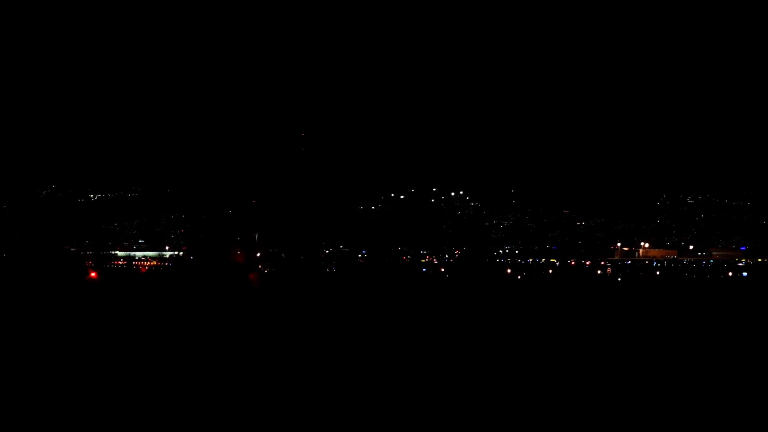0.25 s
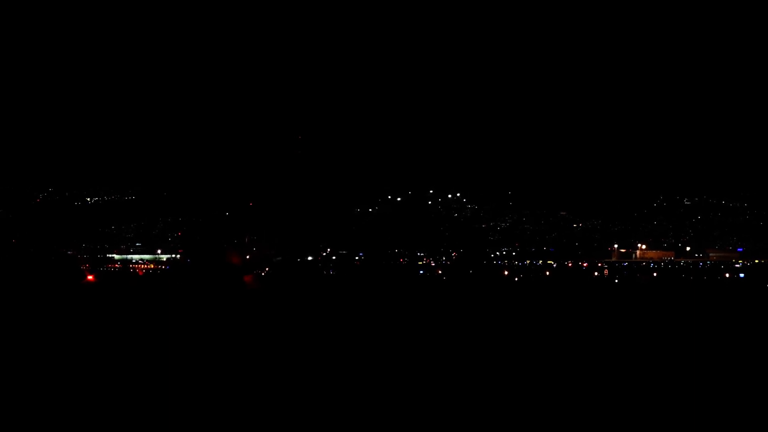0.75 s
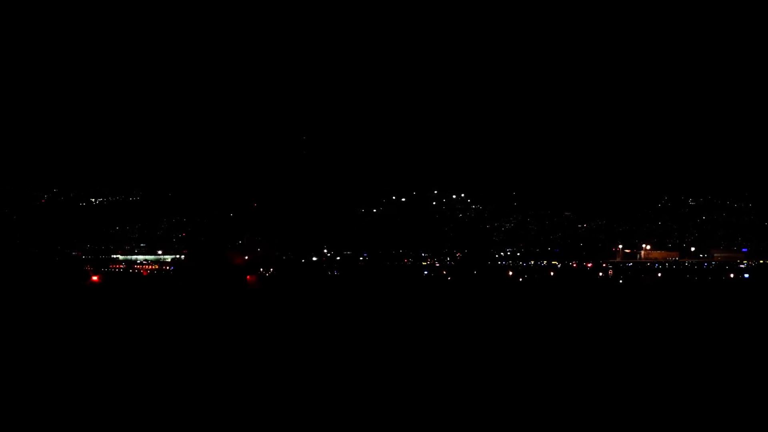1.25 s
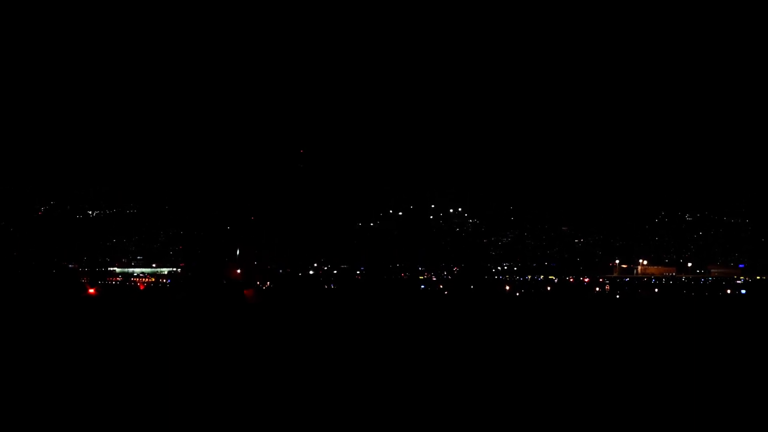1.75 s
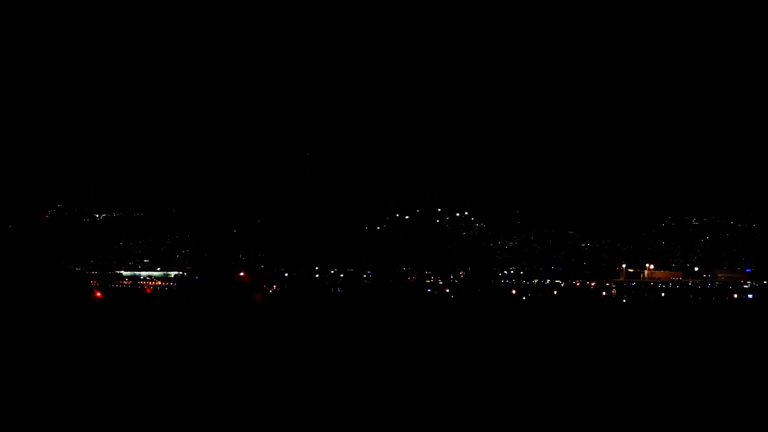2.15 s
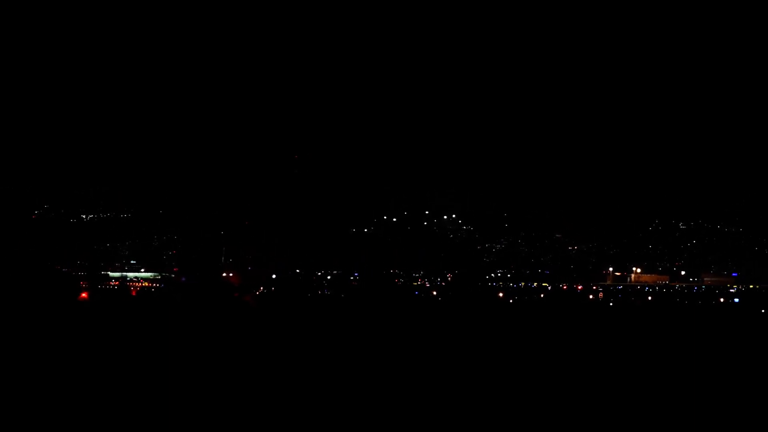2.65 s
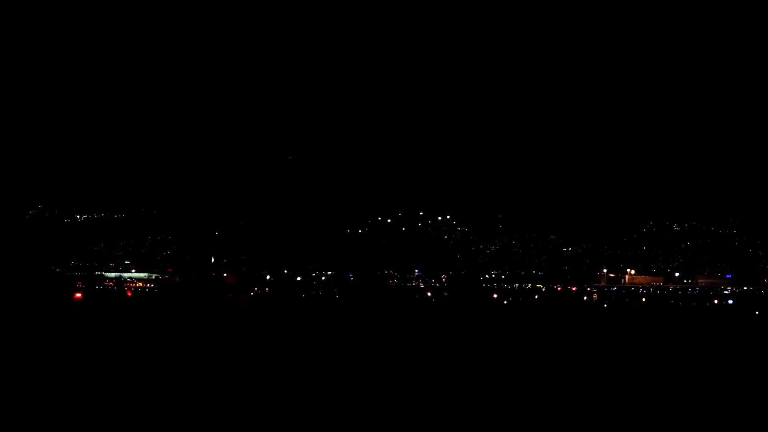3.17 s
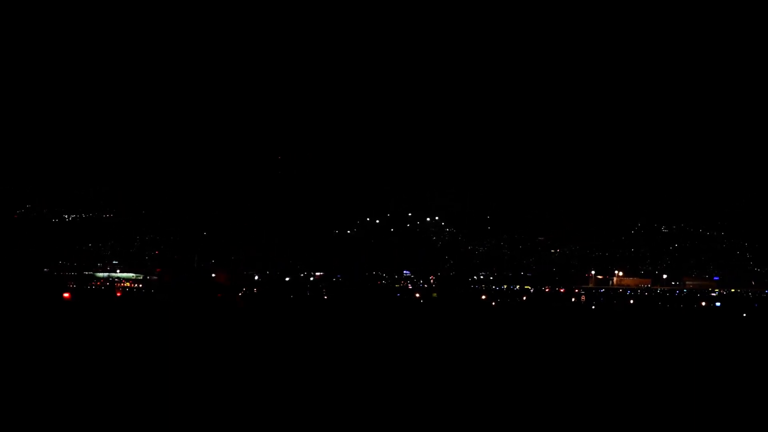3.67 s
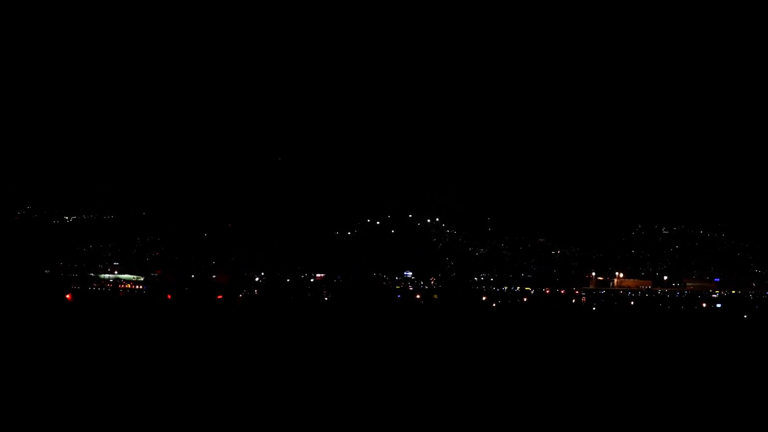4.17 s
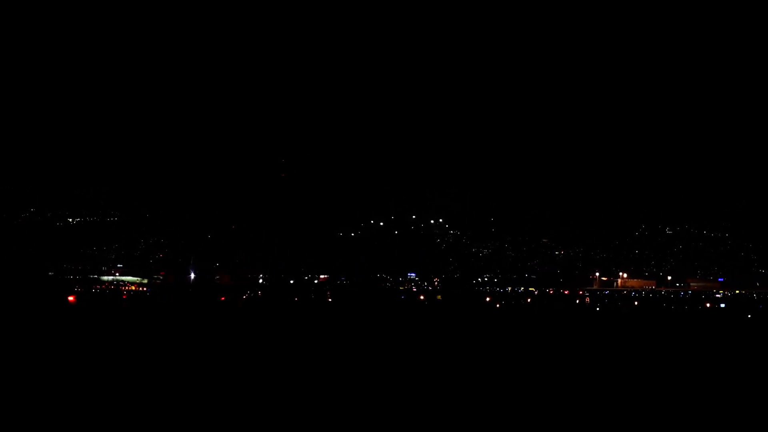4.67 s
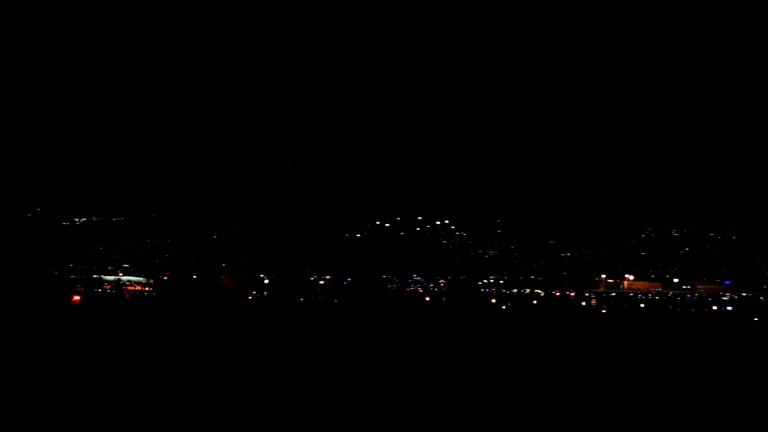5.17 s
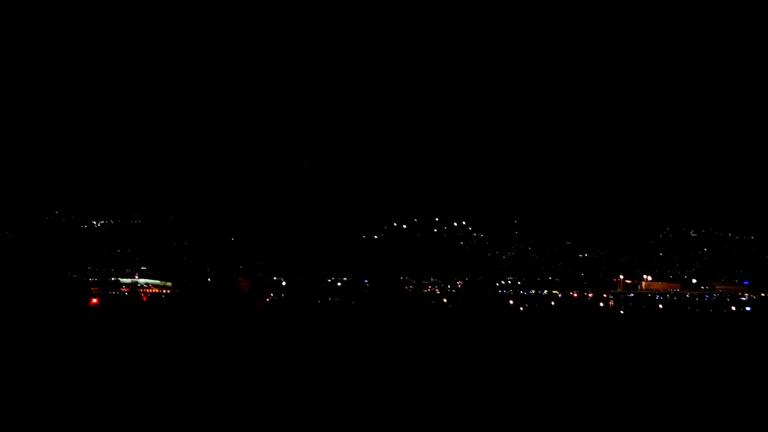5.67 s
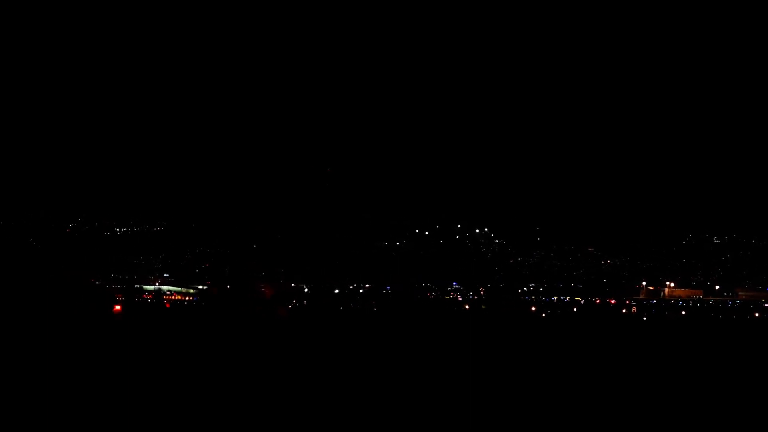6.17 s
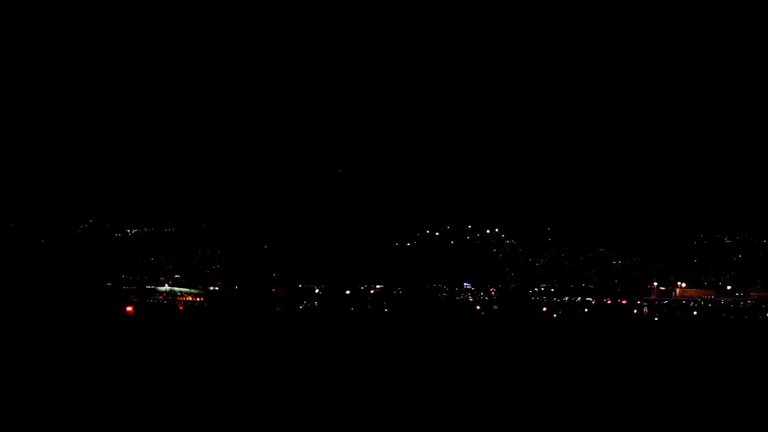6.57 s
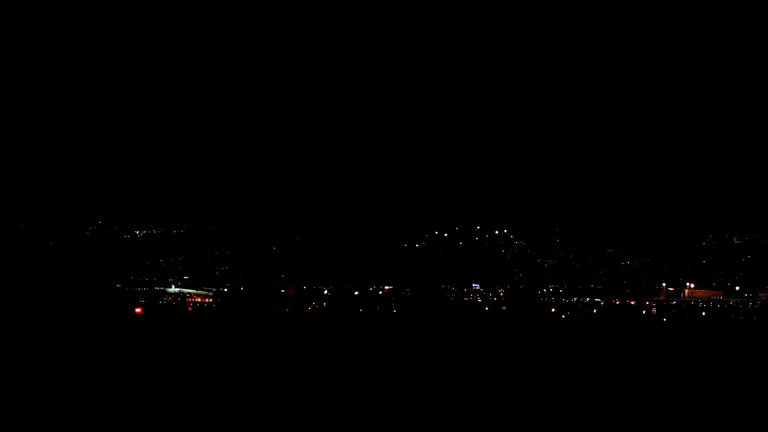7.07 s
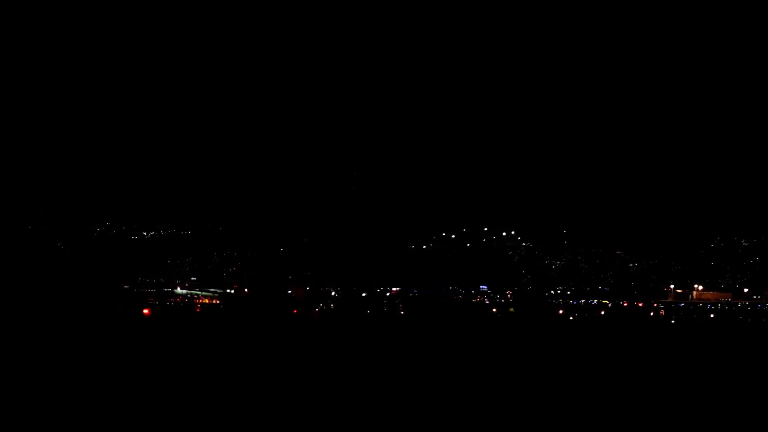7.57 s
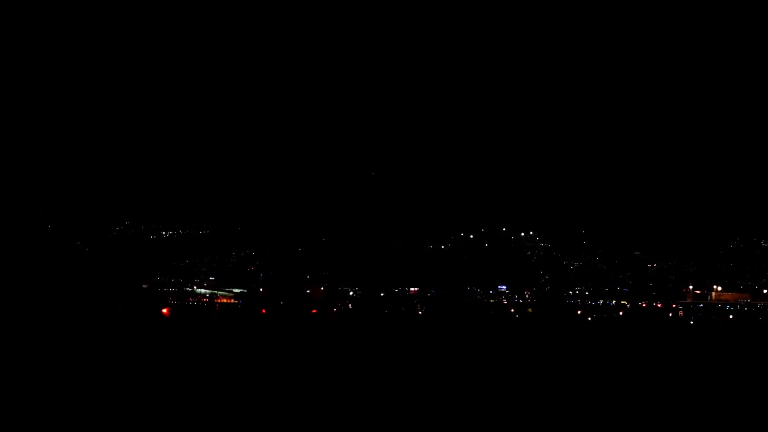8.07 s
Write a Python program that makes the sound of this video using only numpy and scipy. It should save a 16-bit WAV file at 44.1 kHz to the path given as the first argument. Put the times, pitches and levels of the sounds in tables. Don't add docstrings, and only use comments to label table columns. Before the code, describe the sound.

A distant jet airliner's low rumble swells to a heavy roar over a dark airfield while crickets and katydids chirp close by and wind buffets the microphone.

```python
import sys
import numpy as np
from scipy import signal
from scipy.fft import rfft, irfft, next_fast_len
from scipy.io import wavfile

SR = 44100
rng = np.random.default_rng(int(sys.argv[2]) if len(sys.argv) > 2 else 0)


def gain_from_db(level_db):
    decades = np.asarray(level_db, float) / 20
    return 10 ** decades


def transcribe(signal):
    frames = np.atleast_2d(signal).T
    limited = np.clip(frames, -1, 1)
    pcm = np.round(limited * 32767).astype(np.int16)
    wavfile.write(sys.argv[1], SR, pcm)


N = 367132

# f/Hz, density/dB
JET_SPECTRUM = [(12, -53), (22, -12.5), (54, 4.5), (105, -2), (187, -18), (400, -16.5), (600, -17),
                (780, -27), (950, -23), (1180, -30.5), (1430, -28.5), (1800, -37.5), (2080, -37),
                (2800, -44), (3800, -69)]
JET_SPLIT_HZ = [70, 170, 750]
# nearest level/dB, share of nearness, idle far-field level/dB, idle change/(dB/s)
JET_RANGES = [
    (-45, 1.11, -77, 3.5),
    (-44.5, 1.14, -59.5, .5),
    (-49, 1.01, -63.5, .2),
    (-57.5, 0.93, -67, -2.5),
]
# t/s, level/dB
NEARNESS = [(0, -17), (.4, -23.5), (2.3, -20), (3.1, -12), (3.9, -10.5), (4.9, -7.5), (5.7, -4), (6.0, -2),
            (6.45, -0.5), (6.8, 0), (7.1, 0.5), (7.5, .5), (8.0, 1), (8.33, 0.5)]
# start/s, length/s, added amplitude re steady level/dB
SURGES = [
    (6.3, 0.29, -9),
    (7.3, 0.32, -6.5),
]
# t/s, f/Hz, level re roar/dB
RIDGE = [
    (0, 526, -10.5),
    (4.5, 524.7, -17.5),
    (5.8, 548.2, -13.5),
    (6.5, 617.6, -7),
    (7.0, 662, -7.5),
    (7.6, 695, -9.5),
    (8.33, 734, -10.5),
]
# f/Hz, density/dB
AIRFIELD = [(30, -19.5), (102, 4), (221, -8.5), (250, -14.5), (282, -6), (634, -25), (760, -29), (920, -23),
            (1200, -32.5), (1750, -20.5), (2700, -41.5), (4000, -84)]
AIRFIELD_DB = -60
# f/Hz, likeness
LIKENESS = [(100, .9999), (200, 0.99), (500, 0.98), (900, 0.87), (1500, 0.69), (2400, 0.37), (4400, -0.15),
            (12000, 0.012)]

# f/Hz, density/dB
NIGHT = [(1500, -13.5), (2300, -10.5), (2800, -21.5), (3800, -11.5), (4500, -14), (5900, -13), (6300, -15),
         (7400, -16.5), (9500, -11.5), (10250, -15), (10700, -19.5), (12500, -24.5), (15600, -37)]
NIGHT_DB = -73.5

# start/s, length/s, level/dB
GUSTS = [(0, 0.56, -68), (.85, .12, -70), (1.35, 0.16, -69), (2.36, 0.062, -73), (2.66, .28, -66),
         (3.0, 0.21, -75.5), (3.42, 0.19, -92), (4.22, .08, -80), (4.56, .08, -72), (5.14, .2, -82),
         (5.58, .08, -68), (5.83, 0.054, -77), (5.98, 0.16, -74), (6.66, .1, -57), (6.82, 0.21, -52.5),
         (7.22, 0.091, -69), (7.42, .2, -58.5), (7.72, 0.33, -56), (8.15, 0.18, -57.5)]
# f/Hz, density/dB
WIND = [(20, -12), (60, -2), (130, -4.5), (250, -14.5), (600, -43.5), (2000, -110)]
GUST_RISE_S, GUST_FALL_S, CALM_DB = 0.06, 0.065, -83

# start/s, length/s, level/dB
TRILL = [(0, .32, -70), (.55, 0.19, -70.5), (1.05, 0.16, -65.5), (1.47, 0.18, -66), (2.0, 0.22, -68.5),
         (2.5, 0.31, -64), (3.02, 0.31, -65.5), (3.46, 0.19, -68), (3.8, 0.074, -71), (3.95, 0.12, -65.5),
         (4.3, .28, -71), (4.75, .5, -76), (5.57, .2, -73), (6.0, 0.22, -71), (6.5, 0.38, -71.5),
         (6.98, 0.26, -71.5), (7.5, 0.22, -74), (8.06, .18, -71)]
TRILL_RISE_S, TRILL_FALL_S, TRILL_REST_DB = 0.09, 0.057, -90.5

CHORUS_START_DB, CHORUS_SWAY_DB, CHORUS_GROWTH_DB_PER_S = -83, 1.2, 0.45

# first/s, last/s, peak/dB
RATTLES = [
    (.1, .508, -80),
    (2.03, 2.03, -84),
    (2.17, 2.71, -80),
    (3.791, 3.791, -86),
    (4.383, 4.912, -81),
    (6.419, 7.086, -81),
]
# first/s, last/s, peak/dB, f/Hz, left re right/dB
PIPS = [
    (.131, 1.271, -75, 7000, -10),
    (.239, .613, -79, 6550, -4),
    (1.622, 2.968, -74, 6790, 3),
    (3.317, 4.408, -77, 6800, 4),
    (2.225, 2.575, -79, 6900, 2),
    (2.417, 3.816, -75, 6560, -3),
    (3.032, 4.119, -79, 6970, -4),
    (4.99, 5.727, -77, 6850, -10),
]
# first/s, last/s, peak/dB, start f/Hz, left re right/dB
SONGS_AHEAD = [
    (.494, .776, -63.5, 4025, 2.5),
    (4.26, 4.26, -79, 3800, 2.5),
    (4.33, 4.403, -70, 4000, 2.5),
    (4.348, 4.421, -79, 4100, 0),
    (4.467, 4.679, -62, 4030, 2.5),
]
# first/s, last/s, peak/dB, start f/Hz, left re right/dB
SONGS_ASIDE = [
    (1.368, 1.722, -73, 4200, 2),
    (2.099, 2.384, -71.5, 3980, -15),
    (2.43, 2.65, -74, 4150, 3),
    (2.502, 2.728, -75, 3900, -12),
    (2.786, 2.786, -69, 4000, 5),
    (2.856, 3.079, -65, 4120, 5),
    (6.214, 6.214, -72, 4000, 8),
    (6.29, 6.575, -65, 4070, 6),
    (7.114, 7.185, -74, 4200, 6),
    (7.34, 7.485, -74, 4220, -3),
]
# first/s, last/s, peak/dB, start f/Hz, left re right/dB
MUTTERS_AHEAD = [(.878, 1.009, -69, 3930, 2.5), (1.103, 1.155, -68, 3930, 4),
                 (1.266, 1.317, -69, 3840, 2.5), (4.778, 4.954, -69, 3920, 2.5),
                 (5.06, 5.106, -69, 3930, 2.5), (5.235, 5.326, -70, 3880, 2.5),
                 (5.446, 5.491, -72, 3950, 6), (5.65, 5.696, -69, 3870, 2.5)]
# first/s, last/s, peak/dB, start f/Hz, left re right/dB
MUTTERS_ASIDE = [(3.167, 3.24, -69, 3920, 4), (3.285, 3.401, -73, 3930, 5), (3.496, 3.574, -77, 3880, 2),
                 (3.67, 3.72, -74, 3900, 3), (3.808, 3.855, -77, 3850, 3), (6.669, 6.776, -70, 3950, 5),
                 (6.818, 6.948, -71, 3940, 5), (7.23, 7.348, -71, 3880, 3), (7.72, 7.769, -77, 4050, -6)]
# first/s, last/s, peak/dB
ZIPS = [(.64, .688, -71), (1.785, 1.857, -74), (2.909, 2.983, -74), (4.118, 4.19, -73), (5.293, 5.343, -72),
        (6.269, 6.318, -73), (7.571, 7.619, -72)]
SONG_GAP_S, MUTTER_GAP_S, PIP_GAP_S, ZIP_GAP_S, RATTLE_GAP_S = 0.071, 0.043, 0.36, 0.0245, 0.135

MOTOR_S = [0.189, 0.708, 1.189, 1.686, 2.189, 2.689, 3.187, 3.676, 4.177, 4.679, 5.178, 5.266, 5.697, 6.203,
           6.691, 7.188, 7.695, 8.202]
# multiple of step rate, level/dB
MOTOR_LINES = [(28, -9), (29, -10), (32, 0), (33, -10), (34, -18), (36, -19)]
MOTOR_STEP_HZ = 366
# t/s, peak/dB, left re right/dB
TICKS = [(.2946, -62, 5), (.3081, -57, 3), (.321, -64, 5), (.63, -65, 4), (.355, -60, 5), (.3979, -63, 4),
         (.7626, -66, 2)]
# t/s, peak/dB, f/Hz, length/s
KNOCK = (.388, -37, 112, .045)


def rms_one(x):
    return x / np.sqrt(np.mean(x ** 2) + 1e-20)


def in_time(rows):
    s, *columns = np.transpose(rows)
    return [np.interp(np.arange(N) / SR, s, c) for c in columns]


def at_hz(points, hz):
    points_hz, values = np.transpose(points)
    return np.interp(np.log(hz), np.log(points_hz), values)


def drift(rate_hz):
    r = np.exp(-80 * np.pi * rate_hz / SR)
    slow = signal.lfilter([1], [1, -2 * r, r * r], rng.standard_normal(N // 40 + 2002))[2000:]
    return np.interp(np.arange(N) / 40, np.arange(len(slow)), rms_one(slow - slow.mean()))


def coloured(gain, alike):
    size = next_fast_len(N)
    hz = np.maximum(np.arange(size // 2 + 1) * SR / size, 1)
    mid, side = rfft(rng.standard_normal((2, size))) * gain(hz)
    c = np.clip(alike(hz), -1, 1)
    stereo = np.sqrt(1 + c) * mid + np.sqrt(1 - c) * side * [[1], [-1]]
    return rms_one(irfft(stereo, size)[:, :N])


def far_likeness(hz):
    return at_hz(LIKENESS, hz)


def unlike(hz):
    return 0 * hz


def peak(hz, centre_hz, width_hz):
    return 1 / (1 + (2 * (hz - centre_hz) / width_hz) ** 2)


def swells(rows, rise_s, fall_s, rest_db):
    t = np.arange(0, N, 64) / SR
    gain = gain_from_db(rest_db)
    for s, length_s, db in rows:
        ramp = np.minimum((t - s) / rise_s + 1, (s + length_s - t) / fall_s + 1)
        gain = gain + gain_from_db(db) * np.clip(ramp, 0, 1) ** 2
    return np.interp(np.arange(N) / SR, t, gain)


def strokes(rows, gap_s, start_db, settle):
    out = []
    for first, last, db, *rest in rows:
        count = int(round((last - first) / gap_s)) + 1
        for k, s in enumerate(np.linspace(first, last, count)):
            out.append((s, db + start_db * settle ** k + 0.58 * rng.normal(), k, *rest))
    return out


def add(out, s, db, hz, length_s, fall_hz=0., pan_db=0., lead=0., edge=0.94, third_db=-80.):
    t = np.arange(int(length_s * SR)) / SR
    phase = 2 * np.pi * (hz * t - fall_hz * t ** 3 / length_s ** 2 / 3) + rng.uniform(0, 2 * np.pi)
    shape = np.sin(np.pi * t / length_s) ** edge
    left = np.sin(phase + lead) + gain_from_db(third_db) * np.sin(3 * phase)
    pan = gain_from_db(np.array([[pan_db], [-pan_db]]) / 2)
    note = gain_from_db(db) * shape * np.array([left, np.sin(phase)]) * pan
    i = int(s * SR)
    out[:, i:i + len(t)] += note[:, :N - i]


def jet():
    edges_hz = [1] + JET_SPLIT_HZ + [SR]
    out = gain_from_db(AIRFIELD_DB) * coloured(lambda hz: gain_from_db(at_hz(AIRFIELD, hz)), far_likeness)
    [nearness_db] = in_time(NEARNESS)
    levels_db = []
    for db, share, idle_db, change in JET_RANGES:
        near = gain_from_db(db + share * nearness_db)
        idle = gain_from_db(idle_db + change * np.arange(N) / SR)
        levels_db.append(10 * np.log10(near ** 2 + idle ** 2))
    for low, high, level_db in zip(edges_hz, edges_hz[1:], levels_db):
        def band(hz):
            return np.sqrt(1 / (1 + (hz / high) ** 8) - 1 / (1 + (hz / low) ** 8) + 1e-12)
        noise = coloured(lambda hz: gain_from_db(at_hz(JET_SPECTRUM, hz)) * band(hz), far_likeness)
        if high <= JET_SPLIT_HZ[1]:
            noise = noise * swells(SURGES, 0.05, 0.13, 0)
        tilt_db = (low == JET_SPLIT_HZ[-1]) * np.array([[-.7], [.7]])
        out = out + gain_from_db(level_db + .5 * drift(4.9) + tilt_db) * noise
    return out + ground_echo(levels_db[2])


def ground_echo(roar_db):
    ridge_hz, ridge_db = in_time(RIDGE)
    phase = 2 * np.pi * np.cumsum(ridge_hz) / SR
    a, b = coloured(lambda hz: peak(hz, 0, 98), unlike)
    return gain_from_db(roar_db + ridge_db) * (a * np.cos(phase) + b * np.sin(phase))


def night():
    level_db = np.array([[-.3], [.3]]) + NIGHT_DB + 0.56 * drift(10.0)
    return gain_from_db(level_db) * coloured(lambda hz: gain_from_db(at_hz(NIGHT, hz)), far_likeness)


def wind():
    lumps = gain_from_db(np.array([4.7 * drift(19.0), 5.0 * drift(15.0)]))
    noise = rms_one(lumps * coloured(lambda hz: gain_from_db(at_hz(WIND, hz)), unlike))
    return swells(GUSTS, GUST_RISE_S, GUST_FALL_S, CALM_DB) * gain_from_db(2.5) * noise


def trill():
    stroke = np.cumsum(60.5 + 1.2 * drift(2.6)) / SR
    pulses = (.5 - .5 * np.cos(2 * np.pi * stroke)) ** 1.15 * gain_from_db(2.0 * drift(25.0))
    tone_hz = 3205 + 35 * np.sin(2 * np.pi * stroke) + 18 * drift(30.24)
    phase = 2 * np.pi * np.cumsum(tone_hz) / SR
    near = rms_one(pulses * np.array([np.sin(phase - 2.3), np.sin(phase)])) * gain_from_db(np.array([[0], [-9.0]]))
    echoes = coloured(lambda hz: peak(hz, 3250, 180), unlike) * gain_from_db(np.array([[0], [-6.0]]))
    near = np.sqrt(.85) * near + np.sqrt(.15) * echoes
    far = coloured(lambda hz: peak(hz, 3120, 326), unlike)
    throb = 1 + 0.29 * np.cos(2 * np.pi * np.cumsum(58 + 3.13 * drift(3.2)) / SR)
    far_db = -76.5 + 1.95 * drift(0.66) + np.array([[1.5], [-.4]])
    return swells(TRILL, TRILL_RISE_S, TRILL_FALL_S, TRILL_REST_DB) * near + gain_from_db(far_db) * throb * far


def chorus():
    band = coloured(lambda hz: peak(hz, 5490, 290), lambda hz: -.45 + 0 * hz)
    level_db = CHORUS_START_DB + CHORUS_GROWTH_DB_PER_S * np.arange(N) / SR + CHORUS_SWAY_DB * drift(0.54)
    flutter_db = 5.0 + 0.45 * drift(18.0) + 0.77 * drift(40.0)
    return gain_from_db(level_db + flutter_db) * band


def faint_singers(out):
    for when, size, pitch, side in rng.random((420, 4)):
        add(out, when * 6.2, -79 - 6.5 * size, 6300 + 700 * np.sqrt(pitch), .016,
            fall_hz=150, pan_db=16 * (side - .5), lead=5.1 * side)
    for when, size, pitch, side in rng.random((110, 4)):
        add(out, when * 8.2, -81 - 5.0 * size, 3850 + 350 * pitch, .036,
            fall_hz=500, pan_db=12 * (side - 1.0), lead=7.2 * side)


def rattles(out):
    for s, db, k in strokes(RATTLES, RATTLE_GAP_S, start_db=-2.0, settle=0.5):
        for pulse in range(4):
            pulse_s = s - .005 + pulse * .0147 + .0015 * rng.normal()
            add(out, pulse_s, db + 5.5 + 1.5 * rng.normal(), 4900 + 60 * rng.normal(), .012,
                fall_hz=350, pan_db=-5, lead=.9)


def bell_crickets(out):
    for s, db, k, hz, pan_db in strokes(PIPS, PIP_GAP_S, start_db=-3.0, settle=.4):
        add(out, s, db, hz, .028, fall_hz=40, pan_db=pan_db, lead=2.0, edge=0.93)


def songs(out):
    singers = (SONGS_AHEAD, MUTTERS_AHEAD, -.35, -37), (SONGS_ASIDE, MUTTERS_ASIDE, -2.2, -19)
    for song_rows, mutter_rows, lead, third_db in singers:
        for s, db, k, hz, pan_db in strokes(song_rows, SONG_GAP_S, start_db=-2.5, settle=0.19):
            add(out, s, db, hz, .046, fall_hz=676, pan_db=pan_db, lead=lead, third_db=third_db)
        for s, db, k, hz, pan_db in strokes(mutter_rows, MUTTER_GAP_S, start_db=-4.5, settle=0.35):
            length_s = .038 - 0.013 * 0.62 ** k
            add(out, s + .003, db, hz, length_s, fall_hz=11000 * length_s, pan_db=pan_db,
                lead=lead, third_db=third_db)


def katydid(out):
    for s, db, k in strokes(ZIPS, ZIP_GAP_S, start_db=-2.5, settle=.2):
        add(out, s, db, 8150, .013, fall_hz=1200, pan_db=-8.5, lead=1.8)


def insects():
    out = np.zeros((2, N))
    for singer in faint_singers, rattles, bell_crickets, songs, katydid:
        singer(out)
    t = np.arange(int(.15 * SR)) / SR
    scatter = rng.standard_normal((2, len(t))) * np.exp(-t / 0.031) * (t > .006)
    scatter = gain_from_db(-11) * scatter / np.sqrt(np.sum(scatter ** 2, axis=1, keepdims=True))
    return out + signal.oaconvolve(out, scatter, axes=1)[:, :N]


def lens_motor():
    out = np.zeros((2, N))
    for s in MOTOR_S:
        for multiple, line_db in MOTOR_LINES:
            add(out, s, line_db - 86, multiple * MOTOR_STEP_HZ, .088, pan_db=1.5, lead=-1.35, edge=.3)
    return out


def fingers():
    ticks = np.zeros((2, N))
    t = np.arange(int(0.024 * SR)) / SR
    for s, db, pan_db in TICKS:
        crack = rng.standard_normal((2, len(t))) * (np.exp(-t / .0015) + .25 * np.exp(-t / .012))
        level = gain_from_db(db + np.array([[pan_db], [-pan_db]]) / 2)
        i = int(s * SR)
        ticks[:, i:i + len(t)] += (level * crack)[:, :N - i]
    rustle = np.interp(np.arange(N) / SR, [.27, .3, .45, .9, 1.0], [0, 1, .5, .25, 0])
    grains = rng.random(N) < .03 * gain_from_db(6 * drift(20))
    ticks += gain_from_db(-62) * rustle * rng.standard_normal((2, N)) * grains
    housing = signal.butter(2, [3200, 11500], "band", fs=SR, output="sos")
    return signal.sosfilt(housing, ticks + 1e-18)


def knock():
    out = np.zeros((2, N))
    s, db, hz, length_s = KNOCK
    t = np.arange(int(length_s * SR)) / SR
    i = int(s * SR)
    out[1, i:i + len(t)] -= gain_from_db(db) * np.sin(np.pi * t / length_s) * np.sin(2 * np.pi * hz * t)
    return out


def scene():
    camera = lens_motor() + fingers() + knock()
    return jet() + night() + wind() + trill() + chorus() + insects() + camera


def roll_off(x):
    return signal.sosfilt(signal.butter(12, 15620, fs=SR, output="sos"), x)


def record(dry):
    return roll_off(dry)


dry = scene()
out = record(dry)
transcribe(out)
```